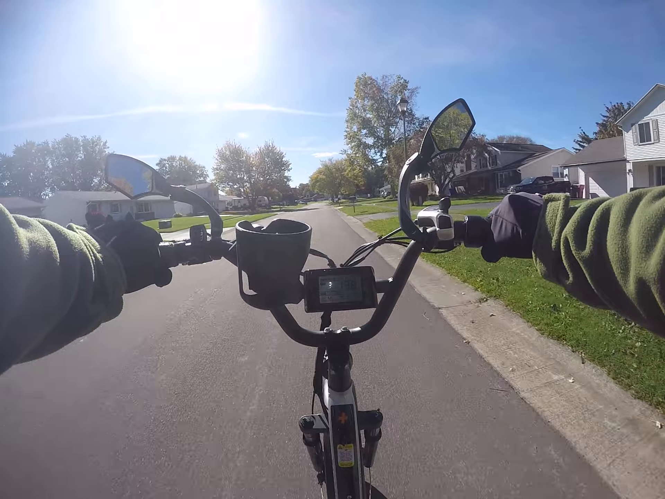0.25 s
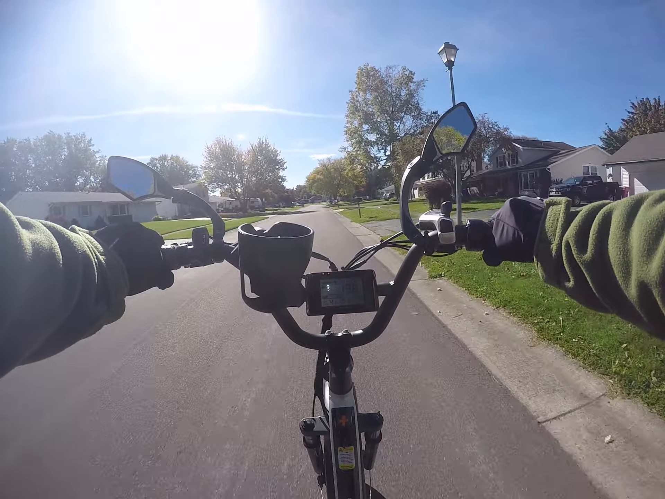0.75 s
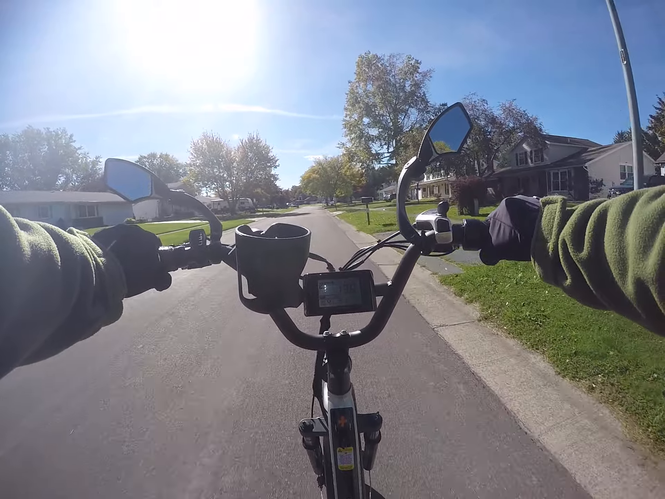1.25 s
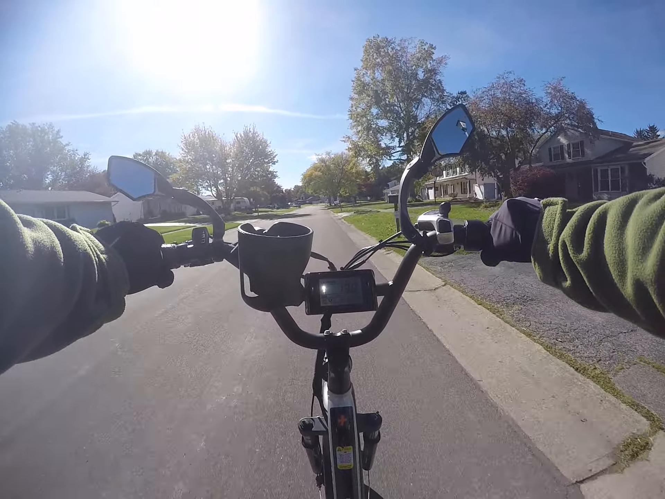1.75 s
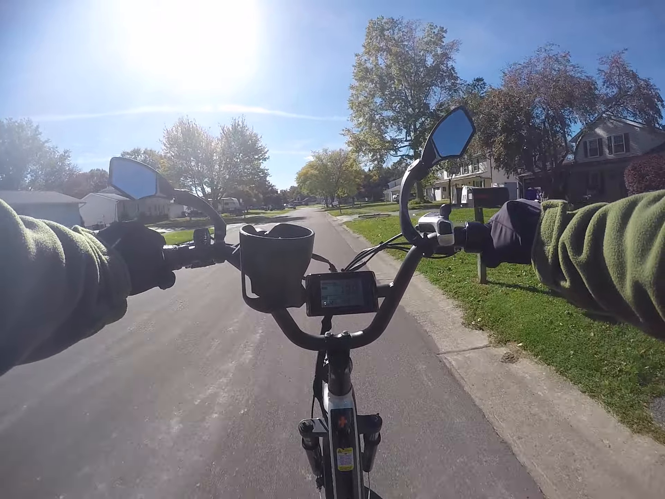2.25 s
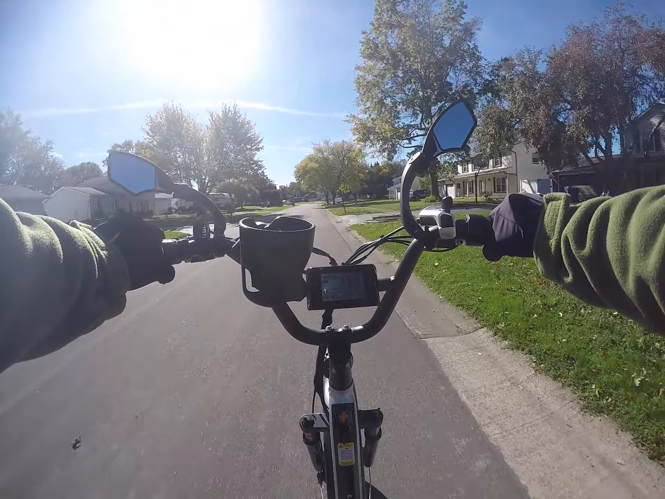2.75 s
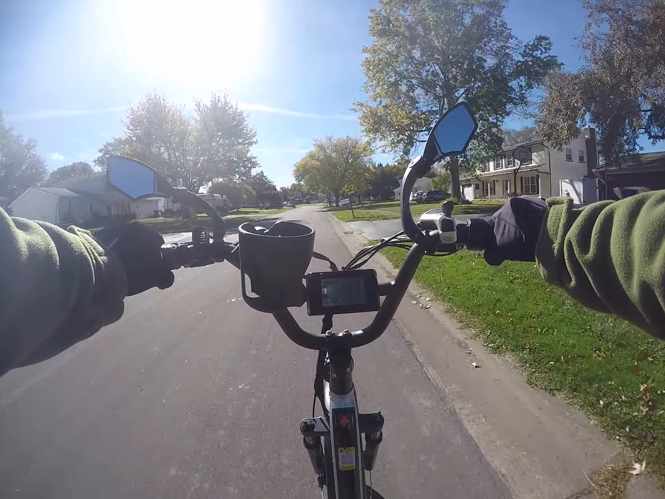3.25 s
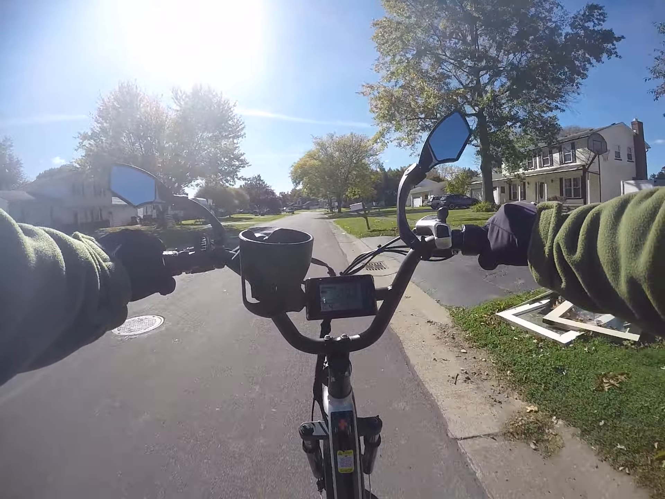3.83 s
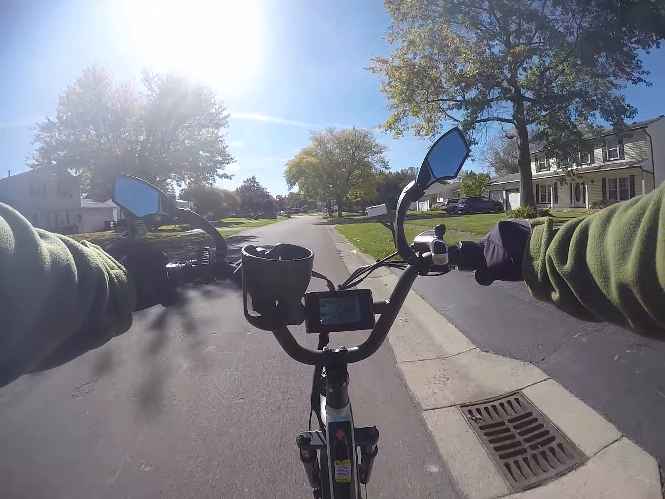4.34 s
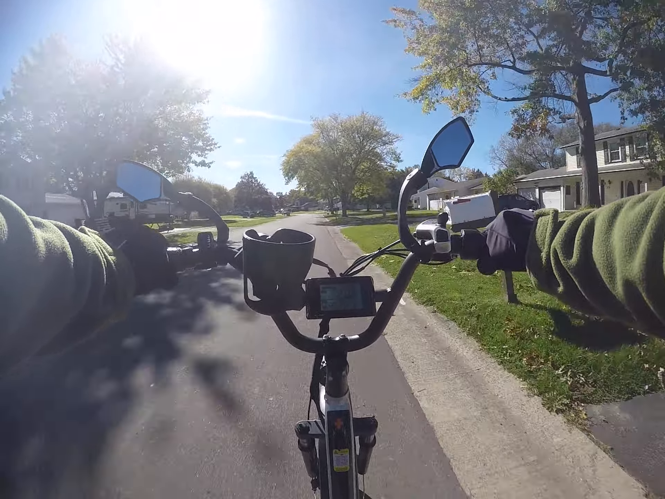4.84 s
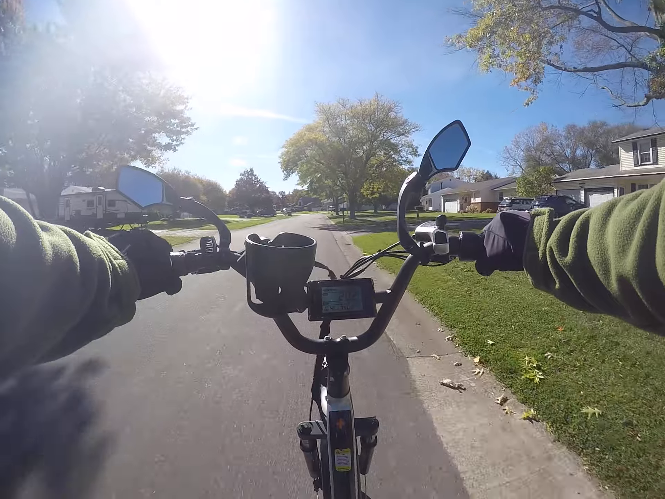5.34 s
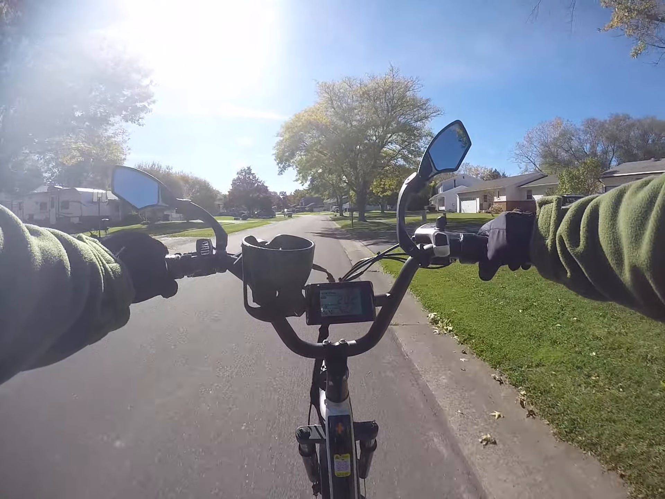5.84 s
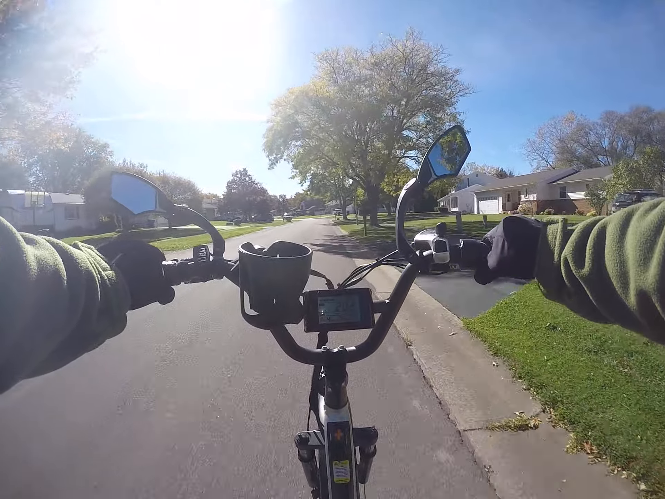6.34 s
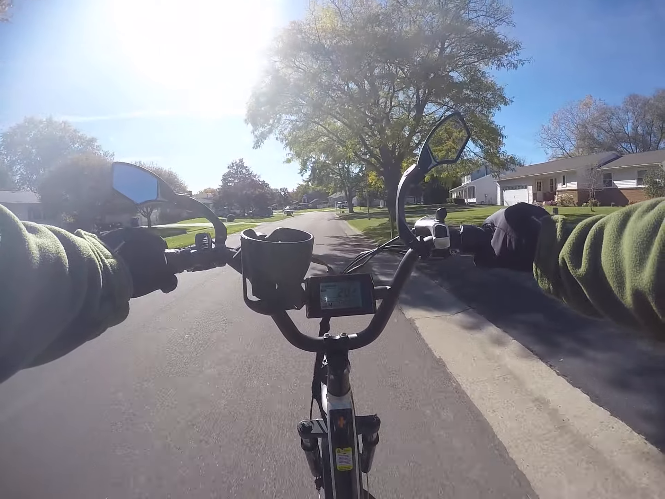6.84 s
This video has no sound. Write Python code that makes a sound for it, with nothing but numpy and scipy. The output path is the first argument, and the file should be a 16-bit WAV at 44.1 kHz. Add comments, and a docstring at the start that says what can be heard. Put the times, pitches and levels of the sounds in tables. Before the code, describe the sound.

Wind buffets the microphone on a moving electric bike, whose throbbing motor whine fades for a short coast and then comes back.

```python
"""A throbbing whine over humming tyres and rumbling wind: an electric bike, heard at the rider's chest.
Meshing teeth in the hub motor make the whine, which dies away as the throttle is eased, then returns.
Tread blocks strike the road periodically and hum, while the grain of the asphalt excites a roar.
Turbulent air buffets the microphone, a hard part of the bike ticks now and then,
and a faint electronic hiss lies beneath it all."""
import sys
import numpy as np
from scipy import signal
from scipy.fft import rfft, irfft, next_fast_len
from scipy.io import wavfile
from scipy.ndimage import map_coordinates

SR = 44100
rng = np.random.default_rng(int(sys.argv[2]) if len(sys.argv) > 2 else 0)


def to_wav(sig):
    """Store sig (one row per channel, or 1-D mono) as 16-bit WAV at the path in sys.argv[1].

    Samples outside -1..1 are clipped; the rate is SR.
    """
    pcm = np.clip(np.atleast_2d(sig), -1, 1) * 32767
    pcm = np.round(pcm).astype(np.int16)
    wavfile.write(sys.argv[1], SR, pcm.T)  # frames by channels


N = 312667

# the rotor gains speed under power and slows as the throttle is eased: (time [s], speed [turns/s])
ROTOR_SPEED = [(0, 27.78), (2.9, 28.02), (3.75, 28.27), (5.5, 28.28), (5.7, 27.85), (6, 27.55),
               (6.55, 27.45), (6.93, 27.02), (7.09, 27.25)]
# speed ripple of off-centre gears: (order [cycles/rotor turn], amplitude [turns/s])
GEAR_RIPPLE = [(.1, .07), (.2, .07), (.3, .04)]
# rasp of sliding teeth at a load of 0 dB: (time [s], level [dB])
RASP_LEVEL = [(0, -62.5), (3.4, -62.5), (4.3, -62), (4.65, -59), (5, -60), (5.6, -61.5), (5.9, -62),
              (6.65, -62), (7.09, -61)]
# motor tones at a load of 0 dB: (order before rounding [cycles/turn], level [dB], flutter [0-1])
MOTOR_TONES = [(10, -93, 0), (18, -59, 0.25), (19, -70.5, 0), (20, -67, 0), (90.2, -68.5, 1),
               (126.6, -70.5, 0.78), (160.3, -74.5, 0.94), (208.7, -83, 1), (247, -87, 0.9)]
# swells of tooth load on each gear turn: (position [turns], relative strength [1])
TOOTH_SWELLS = [(0, 1.25), (.26, .9), (.52, 1.45), (.72, .85)]
# spectrum of the rasp through the hub shell: (frequency [Hz], relative level [dB])
SHELL_SPECTRUM = [(1500, -60), (2380, -8), (2520, 4), (2610, -12), (3100, -4), (3500, 1.5), (3900, -9),
                  (4060, 1), (4300, -6), (4500, 0), (4700, -1), (4980, -25.5), (5750, -10.5), (6300, -20.5),
                  (7000, -15.5), (8000, -27), (12000, -56)]
# tread tones: (order [cycles/wheel turn], relative level [dB], width [cycles/turn], coasting fade [dB/s])
TREAD_TONES = [(99.6, 0, 0.013, -6.5), (103.2, -3.5, 4.1, -4), (200.2, -5.5, 0.09, -1)]
# tyre resonances: (frequency [Hz], width [Hz], relative level [dB])
TYRE_MODES = [(1507, 67, -2), (1654, 168, 0.5), (2022, 110, -6.5), (2207, 110, -9), (2732, 130, -9.5),
              (2914, 110, -14.5), (3480, 130, -15), (3690, 140, -17)]
# spectrum of the road noise: (frequency [Hz], relative level [dB])
ROAD_SPECTRUM = [(120, -8), (230, -9), (290, -3.5), (420, -8.5), (560, -3), (680, -4), (800, -9),
                 (1100, -10), (1320, -16), (1900, -10), (3000, -25.5), (4600, -22.5), (5100, -32.5),
                 (9000, -55.5)]
# rougher and smoother asphalt: (centre time [s], duration [s], change of roar [dB])
ASPHALT_PATCHES = [(0.033, 1, -0.6), (0.993, 0.88, 0.5), (2, 1, -2), (2.617, 0.38, 0.5), (3.78, 0.84, 1),
                   (4.596, .5, 1.8), (5.9, .5, 1)]
# spectrum of the large eddies: (frequency [Hz], relative level [dB])
BUFFET_SPECTRUM = [(10, -3.5), (20, 7.5), (30, 4.5), (50, -2), (70, -8), (120, -43), (250, -62),
                   (600, -120)]
# spectrum of the small eddies: (frequency [Hz], relative level [dB])
FLUTTER_SPECTRUM = [(35, -16), (70, 1.5), (100, -1.5), (140, -6.5), (200, -16.5), (400, -35.5), (1500, -53),
                    (4000, -120)]
# gusts over the headwind: (peak time [s], duration [s], change of buffet [dB], change of flutter [dB])
WIND_GUSTS = [(.25, 1, 1.5, 4), (1.13, 0.71, 3.5, 5), (1.573, .26, 7, 5.5), (2.404, 0.23, 10, 5.5),
              (3.488, 0.77, 2.5, 3), (4.153, 0.29, 9, -2), (4.627, 0.41, 6, -2), (5.051, 1, 3, 6),
              (5.683, .14, 7.5, 3), (6.904, 1, 2.5, 4.5)]
# lulls in all the wind: (centre time [s], duration [s], change of level [dB])
WIND_LULLS = [(1.795, 0.14, -9), (3.897, 0.19, -4), (5.616, 0.075, -12), (6.178, 0.17, -4),
              (6.53, 0.066, -7)]
# ticks on the bike: (time [s], ring gain [dB], scuff level [dB])
TICK_EVENTS = [(2.41, -38, -58), (4.081, -39, -54), (5.668, -28.5, -42), (6.625, -34.5, -56)]
# modes of the hard part: (frequency [Hz], relative level [dB], time to decay by 60 dB [s])
PART_MODES = [(2150, -6.5, 0.024), (2640, -10, .015), (3380, -3.5, 0.012), (3900, -11, .012)]
# spectrum of the scuff: (frequency [Hz], relative level [dB])
SCUFF_SPECTRUM = [(800, -24), (2100, -1), (3400, 0), (5000, -13), (6300, -11), (8000, -18), (10000, -14),
                  (11500, -22), (13300, -15), (16000, -32)]
# spectrum of the electronic hiss: (frequency [Hz], relative level [dB])
HISS_SPECTRUM = [(1000, -21), (6000, 8), (8000, 4.5), (9300, 4.5), (9900, 1), (11500, 1), (13300, 3.5),
                 (13900, -1), (14800, -1), (16000, -12)]
# bands of electric sizzle: (frequency [Hz], width [Hz], level [dB])
SIZZLE_BANDS = [(9475, 160, -78.5), (14230, 260, -83)]

# the throttle is eased, shut and opened again; the motor follows within RESPONSE_S
EASE_S, SHUT_S, OPEN_S, RESPONSE_S = 5.64, 5.97, 6.6, .04


def motor(rotor, load_db, whine_db=-49.0, chatter_db=-59, grit_db=2.0):
    """Gear mesh: teeth meet periodically, and recurring tooth errors modulate the tone into sidebands."""
    gear = rotor / 5  # turns
    tooth_cycle = gear / 2  # the same teeth meet again after two gear turns
    mesh_phase = 2 * np.pi * 36 * rotor
    swells = sum(size * np.exp(9 * (np.cos(2 * np.pi * (gear - at)) - 1)) for at, size in TOOTH_SWELLS)
    depth = np.clip(.7 * amp(load_db), 0, .72)  # the harder the motor pulls, the deeper it throbs
    throb = .8 * (1 - depth + depth * swells / swells.mean())
    errors = .17 * pattern(tooth_cycle, 14) + .11 * pattern(tooth_cycle, 36)
    lag = .3 * unit(pattern(gear, 5).real) + .22 * unit(pattern(tooth_cycle, 12).real)
    whine = amp(whine_db) * tone(throb + errors, mesh_phase + lag)
    tones = 0
    for order, db, flutter in MOTOR_TONES:
        strength = 1 - flutter / 2 + flutter * pattern(tooth_cycle, 10)
        phase = 2 * np.pi * round(order) * rotor + 0.69 * wobble(12)
        tones += amp(db) * tone(strength, phase)
    # loose teeth chatter in a rough band just under the whine
    chatter = amp(chatter_db) * tone(pattern(gear / 8, 85), 2 * np.pi * 34.5 * rotor)
    # sliding teeth rasp through the hub shell, once on each rotor turn and with the tooth pattern
    sliding = 0.14 * np.cos(2 * np.pi * rotor) + 1.24 * unit(pattern(tooth_cycle, 43).real)
    grit = amp(grit_db * sliding + 0.45 * wobble(10))
    rasp = amp(curve(RASP_LEVEL)) * unit(grit * noise(shape(SHELL_SPECTRUM)))
    # under light load the tones fade faster than the noises
    return amp(load_db) * (whine + tones) + amp(load_db / 3) * chatter + amp(load_db / 2) * rasp


def rotor_speed(surge_s=4.44, surge_half_s=.13):
    """Eccentricity: off-centre gears add a periodic ripple to the rotor's speed, in turns per second."""
    u = (np.arange(N) / SR - surge_s) / surge_half_s
    surge = .42 * u * np.exp((1 - u * u) / 2)  # one sag, then an overshoot
    trend = curve(ROTOR_SPEED) + surge + .04 * wobble(7)
    turns = np.cumsum(trend) / SR
    ripple = sum(size * np.sin(2 * np.pi * (order * turns + rng.random())) for order, size in GEAR_RIPPLE)
    return trend + ripple


def motor_load(cruise_db=0.5, ease_step_db=-3, ease_db_per_s=-19, shut_db=-50, resume_db=-1.5):
    """Finite response time: the load, in dB, follows the throttle through cruise, ease, coast and pull."""
    t = np.arange(N) / SR
    after = lambda s: np.clip((t - s) / RESPONSE_S, 0, 1)
    load_db = cruise_db + after(EASE_S) * (ease_step_db + ease_db_per_s * (t - EASE_S))
    load_db += after(SHUT_S) * (shut_db - load_db)
    return load_db + after(OPEN_S) * (resume_db - load_db)


def tread_hum(wheel, hum_db=-53.5, sway_turns=0.00082):
    """Periodic impact: tread blocks strike the road at frequencies proportional to the wheel's speed."""
    # time since the throttle was eased, back to 0 when it opens
    coast_s = curve([(EASE_S, 0), (OPEN_S - RESPONSE_S, OPEN_S - EASE_S), (OPEN_S + RESPONSE_S, 0)])
    # a slightly out-of-round tyre runs ahead and falls behind
    tread = wheel + sway_turns * unit(pattern(wheel / 2, 6.8).real)
    hum = 0
    for order, db, width, fade in TREAD_TONES:
        smear = pattern(wheel / 32, width * 32, size=4096)
        steadied = smear / (np.abs(smear) + 0.49)
        hum += amp(db + fade * coast_s) * tone(steadied, 2 * np.pi * order * tread)
    return amp(hum_db) * hum


def tyre_roar(roar_db=-50, road_db=-1, grain_db=1.8):
    """Random excitation: grainy asphalt drives the tyre's resonances, over a broad road noise."""
    grain = amp(grain_db * wobble(350) + 0.16 * wobble(27))
    ring = noise(lambda hz: np.sqrt(sum((amp(db) * bell(hz - f, w)) ** 2 for f, w, db in TYRE_MODES)))
    road = amp(1.16 * wobble(25)) * noise(shape(ROAD_SPECTRUM))
    patch_db = sum(db * swell(s, length) for s, length, db in ASPHALT_PATCHES)
    return amp(roar_db + patch_db) * (unit(grain * ring) + amp(road_db) * unit(road))


def wind(buffet_db, flutter_db, lumpy_db=2.5, flicker_db=2.45):
    """Turbulent pressure: large eddies thump the microphone and smaller ones flutter over them."""
    eddies = signal.hilbert(noise(shape(BUFFET_SPECTRUM)))
    # the envelope is compressed: the gust sets the size of the eddies, chance sets their timing
    evened = eddies.real / np.sqrt(np.abs(eddies) + 0.99)
    buffet = unit(amp(lumpy_db * wobble(10)) * evened)
    flutter = unit(amp(flicker_db * wobble(18)) * noise(shape(FLUTTER_SPECTRUM)))
    return amp(buffet_db) * buffet + amp(flutter_db) * flutter


def airflow(buffet_db=-36, flutter_db=-48.5):
    """Unsteady flow: gusts and lulls shift the headwind's buffet and flutter levels, in dB."""
    lull_db = sum(db * swell(s, length) for s, length, db in WIND_LULLS)
    buffet_db += sum(db * swell(s, length) for s, length, db, _ in WIND_GUSTS)
    flutter_db += sum(db * swell(s, length) for s, length, _, db in WIND_GUSTS)
    return buffet_db + lull_db, flutter_db + lull_db


def ticks(rise_s=0.00083):
    """Damped free vibration: a hard part scuffs, and its modes ring with exponential decay."""
    t = np.arange(SR // 10) / SR
    ring, scuff = np.zeros(N), np.zeros(N)
    for s, ring_db, scuff_db in TICK_EVENTS:
        start = round((s - rise_s) * SR)
        modes = sum(amp(db - 60 * t / t60) * np.sin(2 * np.pi * (hz * t + rng.random()))
                    for hz, db, t60 in PART_MODES)
        ring[start:start + len(t)] += amp(ring_db) * modes * (1 - np.exp(-t / rise_s))
        scuff[start:start + len(t)] += amp(scuff_db) * t / rise_s * np.exp(1 - t / rise_s)
    return ring + scuff * noise(shape(SCUFF_SPECTRUM))


def electronics(hiss_db=-71.0, pulse_hz=60):
    """Self-noise: the camera's broad hiss, and two narrow bands of amplitude-modulated sizzle."""
    pulse = 1 + .4 * np.cos(2 * np.pi * pulse_hz * np.arange(N) / SR)
    sizzle = sum(amp(db) * unit(pulse * noise(lambda hz: bell(hz - f, w))) for f, w, db in SIZZLE_BANDS)
    return sizzle + amp(hiss_db) * noise(shape(HISS_SPECTRUM))


def amp(db):
    """Amplitude ratio of a level in decibels."""
    return 10 ** (np.asarray(db) / 20)


def unit(x):
    """Normalisation to rms 1."""
    return x / np.sqrt(np.mean(np.abs(x) ** 2) + 1e-20)


def tone(envelope, phase):
    """Modulation of a carrier by a complex envelope, at rms 1."""
    return unit(np.real(envelope * np.exp(1j * phase)))


def curve(rows):
    """Linear interpolation of (time [s], value) rows at every sample."""
    return np.interp(np.arange(N) / SR, *np.transpose(rows))


def swell(middle_s, length_s):
    """A raised cosine, from 0 to 1 and back."""
    return np.cos(np.pi * np.clip((np.arange(N) / SR - middle_s) / length_s, -.5, .5)) ** 2


def wobble(rate):
    """A smooth random curve through rate knots a second."""
    return map_coordinates(rng.standard_normal(int(N * rate / SR) + 4), [np.arange(N) * rate / SR])


def pattern(turns, width, size=2048):
    """Fourier series of random phases: complex unevenness that repeats on every turn."""
    orders = np.fft.fftfreq(size, 1 / size)
    lap = np.fft.ifft(np.exp(2j * np.pi * rng.random(size)) * bell(orders, width) * (orders != 0))
    return unit(np.interp(turns, np.arange(size) / size, lap, period=1))


def filtered(x, response):
    """Linear filtering: the spectrum of x times a frequency response."""
    size = next_fast_len(N + SR // 2)
    return irfft(rfft(x, size) * response(np.fft.rfftfreq(size, 1 / SR)), size)[:N]


def shape(points):
    """Response through (frequency [Hz], level [dB]) points on a log axis."""
    f, db = np.transpose(points)
    return lambda hz: amp(np.interp(np.log(hz + 1), np.log(f + 1), db))


def bell(offset, width):
    """Gain of a resonance with steep skirts."""
    return 1 / (1 + (offset / width * 1.3) ** 2)


def noise(response):
    """White noise coloured by a response, at rms 1."""
    return unit(filtered(rng.standard_normal(N), response))


def scene():
    """Superposition: motor and tread, turning in a constant ratio, add to roar, ticks, wind and hiss."""
    rotor = np.cumsum(rotor_speed()) / SR  # turns
    wheel = rotor * .1214
    bike = motor(rotor, motor_load()) + tread_hum(wheel) + tyre_roar() + ticks()
    return (bike + wind(*airflow()) + electronics())[None]


def record(dry, notch_hz=2125, notch_db=-11, top_hz=15300):
    """Transfer function: the camera's housing cuts a narrow notch; nothing passes above the band limit."""
    return filtered(dry[0], lambda hz: amp(notch_db * bell(hz - notch_hz, 23)) * (hz < top_hz))[None]


dry = scene()
out = record(dry)
to_wav(out)
```